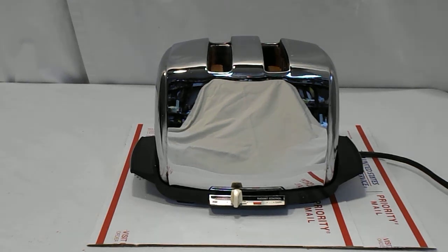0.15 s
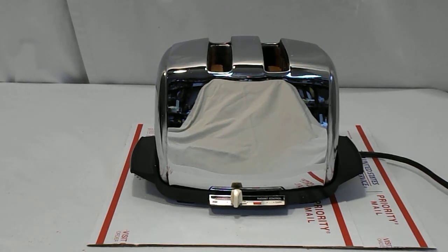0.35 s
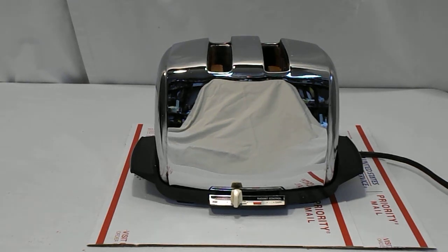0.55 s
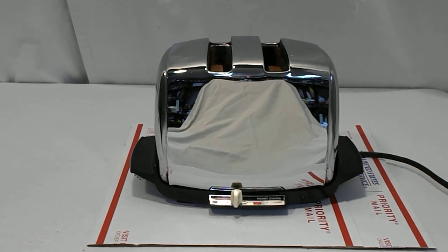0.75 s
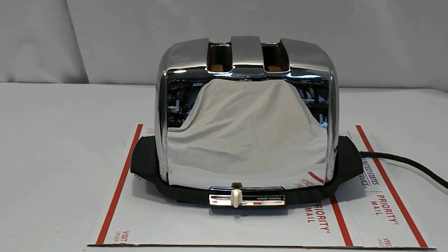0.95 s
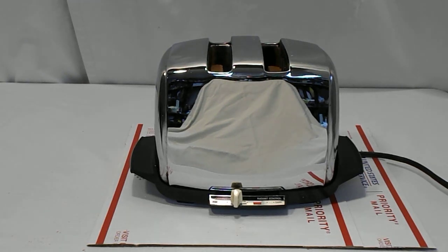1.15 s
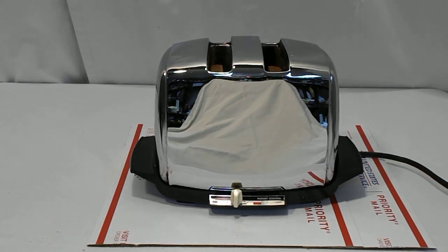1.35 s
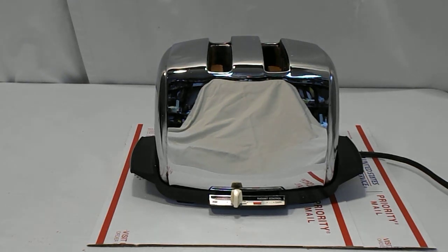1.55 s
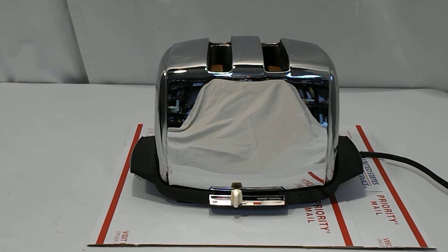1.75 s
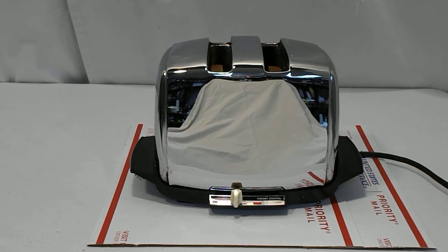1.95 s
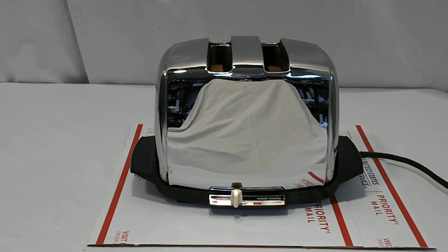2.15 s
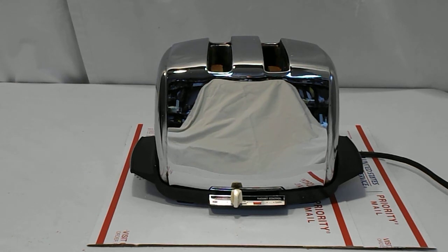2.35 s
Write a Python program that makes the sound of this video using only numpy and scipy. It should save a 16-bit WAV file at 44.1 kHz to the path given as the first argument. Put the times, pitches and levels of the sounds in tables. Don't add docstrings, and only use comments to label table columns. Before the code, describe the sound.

One crisp, rattly toaster click with a short metal ring, amid soft sliding hiss and quiet room noise.

```python
import sys
import numpy as np
from scipy import signal
from scipy.io import wavfile
from scipy.ndimage import uniform_filter1d

SR = 44100
rng = np.random.default_rng(int(sys.argv[2]) if len(sys.argv) > 2 else 0)


def master(y):
    cut = np.clip(np.atleast_2d(y).T, -1, 1)
    pcm = np.round(cut * 32767)
    wavfile.write(sys.argv[1], SR, pcm.astype(np.int16))


def magnitude_from_level(level_db):
    exponent = np.asarray(level_db, float) / 20
    return 10 ** exponent


N = 110250

# (frequency [Hz], level per Hz [dB])
AIR = [(15, -60), (25, -32), (48, -14), (87, -8.5), (221, -1), (417, -5.5), (824, -10), (4060, -20),
       (6800, -27), (8840, -64), (15000, -120)]
# (time [s], level [dB])
AIR_LEVEL = [(0, -60), (.8, -63), (1.9, -63), (2.5, -62)]
# (frequency [Hz], level [dB])
HUM = [(60, -83.5), (120, -81.5), (300, -82)]
# (resonance [Hz], width [Hz], level [dB])
GUIDES = [(1200, 1400, -8.5), (2350, 800, -8), (2965, 320, -1), (3215, 600, 1), (3850, 500, -1),
          (4400, 750, -0.5), (5287, 760, -9.5)]
# (time [s], level [dB])
SLIDE_LEVEL = [
    (0, -61),
    (.11, -60),
    (.2, -61),
    (.4, -62),
    (.64, -63),
    (.72, -67),
    (.8, -80),
    (.86, -95),
]
# (time [s], level [dB], centre [Hz], width [Hz])
TICKS = [
    (1.995, -56.5, 870, 1280),
    (2.0094, -67, 4070, 2000),
    (2.0821, -69, 4750, 3470),
    (2.160, -70, 5450, 2500),
    (2.2307, -68, 5300, 2500),
    (2.269, -63, 4640, 3880),
    (2.343, -68, 5030, 3200),
]
# (time [s], level [dB], frequency [Hz], time to fall 60 dB [s])
RINGS = [
    (2.0105, -58, 4530, .11),
    (.2174, -54, 225, .3),
    (.2174, -52, 430, .2),
]
# (time [s], level [dB], extra treble [dB])
CONTACTS = [(.2066, -25.5, -18.5), (.2095, -29, -12), (0.211, -27, -7), (.2145, -29.5, 1),
            (.2161, -22.5, 7), (.2174, -26, 3.5), (.2194, -20, 4.5), (.2207, -20.5, 7), (.2221, -28, 4.5),
            (.2238, -31.5, 3.5), (.2253, -30, -3), (.2266, -19, 0), (.2290, -25, -1.5), (.2317, -30.5, -1),
            (.2343, -18.5, -5), (.2380, -29.5, -5.5)]
# (frequency [Hz], level [dB], time to fall 60 dB [s])
SHELL = [(554, -7, .2), (672, -11, .18), (752, -10, .33), (979, -3, .16), (1141, -4, .16), (1181, -6, .15),
         (1541, -7, .12), (1775, -10, .17), (1945, -11, .16), (2300, -9, .07), (2937, -12, .1),
         (3025, -17, .2)]
# (frequency [Hz], level [dB], time to fall 60 dB [s])
WIRES = [(3400, -12, .13), (3749, -8, .16), (4050, -6, .11), (4085, -1, .12), (4107, -5, .17),
         (4312, -8, .11), (4469, -8, .11), (4686, -10, .14), (4759, -7, .11), (4875, -7, .11),
         (5203, -7, .12), (5254, -7, .12), (5930, -7, .11), (6050, -2, .08)]
# (frequency [Hz], level [dB])
CLATTER = [(480, -29), (620, -9), (1000, -7.5), (2700, -15), (4140, -6.5), (6100, -1.5), (7800, -20.5),
           (10900, -24)]
# (frequency [Hz], time to fall 60 dB [s])
CLATTER_T60 = [(400, 0.33), (1000, .22), (2500, 0.29), (4000, 0.26), (6000, .17), (7600, 0.1), (9200, .16),
               (11000, .13)]
# (centre [Hz], width [Hz], level [dB])
HISS = [(7800, 970, -96.5), (8950, 850, -96.5), (10660, 1000, -91)]
# (centre [Hz], width [Hz])
NOTCHES = [(6950, 1000), (8450, 720), (10000, 270)]

SHELL_DB, WIRES_DB, CRACK_DB, CLATTER_DB = -20, -15.5, 4, -19
CRACK_T60_S, TICK_T60_S, RISE_S = .0066, .1, .0004
SCRAPE_S, SCRAPE_LEN_S, SCRAPE_DB = .668, .03, -70.5
STIR_DB, STIR_HZ, STIR_FROM_S = -71.5, 1110, 1.97
GRAINS_PER_S, GRAINS_DB, GRAIN_SPREAD_DB = 65, -74, 2
WAVER_DB, WAVER_PER_S = 3, 60
PULSE_HZ, PULSE_S, PULSE_DB = 78.05, .001, 9
LIMIT = .4


def unit(x):
    return x / np.sqrt(np.mean(x ** 2))


def cut(x, hz, kind, order=4):
    return signal.sosfilt(signal.butter(order, hz, kind, fs=SR, output="sos"), x)


def band(hz, width, order=1, size=N):
    edges = [max(hz - width / 2, 10), hz + width / 2]
    sos = signal.butter(order, edges, "band", fs=SR, output="sos")
    return unit(signal.sosfilt(sos, rng.standard_normal(size)))


def read(table, at, log=False):
    x, y = np.array(table).T
    return np.interp(np.log(at), np.log(x), y) if log else np.interp(at, x, y)


def walk(rate):
    hold = int(SR / rate)
    steps = np.repeat(rng.standard_normal(N // hold + 1), hold)
    return unit(uniform_filter1d(uniform_filter1d(steps, hold), hold)[:N])


def fade(t, t60):
    since = np.clip(t, 0, None)
    return (1 - np.exp(-since / RISE_S)) * np.exp(-np.log(1000) * since / t60)


def room(t):
    air = 0
    for hz in 25 * 2 ** np.arange(0, 8.2, 1 / 3):
        flicker = magnitude_from_level(read(AIR, hz, True) + 1.2 * walk(16))
        air = air + band(hz, hz / 4, order=2) * np.sqrt(hz) * flicker
    stir = magnitude_from_level(STIR_DB + 4.2 * walk(5.23)) * band(STIR_HZ, 1100, order=2)
    stir = stir * np.clip((t - STIR_FROM_S) / 0.081, 0, 1)
    hum = sum(magnitude_from_level(db) * np.sqrt(2) * np.sin(2 * np.pi * hz * t) for hz, db in HUM)
    return unit(air) * magnitude_from_level(read(AIR_LEVEL, t)) + stir + hum


def crackle():
    chance, luck = rng.random((N, 2)).T
    strength = magnitude_from_level(-GRAIN_SPREAD_DB * np.log(luck + 0.032))
    grains = (chance < GRAINS_PER_S / SR) * strength * np.sign(rng.standard_normal(N))
    dull = cut(cut(grains, 1500, "low", order=2), 200, "high", order=2)
    return magnitude_from_level(GRAINS_DB) * unit(dull)


def ticks(t):
    out = np.zeros(N)
    for s, db, hz, t60 in RINGS:
        out += magnitude_from_level(db) * fade(t - s, t60) * np.sin(2 * np.pi * hz * (t - s))
    for s, db, hz, width in TICKS:
        out += magnitude_from_level(db) * band(hz, width, order=2) * fade(t - s, TICK_T60_S)
    return out


def carriage(t):
    rub = sum(magnitude_from_level(db + 0.69 * walk(10)) * band(hz, width, order=2) for hz, width, db in GUIDES)
    rub = unit(cut(rub, 5645, "low", order=6))
    swell = np.exp(-((t - SCRAPE_S) / SCRAPE_LEN_S) ** 2)
    scrape = magnitude_from_level(SCRAPE_DB) * swell * band(6450, 2300, order=3)
    return rub * magnitude_from_level(read(SLIDE_LEVEL, t)) + scrape


def ring(modes, t, energy):
    out = np.zeros(len(t))
    for hz, db, t60 in modes:
        waver = magnitude_from_level(db + WAVER_DB * walk(WAVER_PER_S)[:len(t)])
        phase = 2 * np.pi * rng.random()
        out += waver * energy(hz, t60) * np.sin(2 * np.pi * hz * t + phase)
    return out


def switch(t):
    span = slice(int(.2 * SR), int(.6 * SR))
    u = t[span]
    start, db, treble_db = np.array(CONTACTS).T[:, :, None]

    def energy(hz, t60):
        strength = magnitude_from_level(db + treble_db * (hz > 2800))
        return np.sqrt(np.sum((strength * fade(u - start, t60)) ** 2, axis=0))

    hit = magnitude_from_level(SHELL_DB) * ring(SHELL, u, energy) + magnitude_from_level(WIRES_DB) * ring(WIRES, u, energy)
    for hz in 400 * 2 ** np.arange(0, 4.9, .4):
        clatter = magnitude_from_level(CLATTER_DB) * energy(hz, read(CLATTER_T60, hz, True))
        crack = magnitude_from_level(CRACK_DB) * energy(hz, CRACK_T60_S)
        colour = magnitude_from_level(read(CLATTER, hz, True)) * np.sqrt(hz / 4000)
        hit = hit + band(hz, hz / 3.5, order=2, size=len(u)) * colour * (clatter + crack)
    out = np.zeros(N)
    out[span] = hit
    return cut(out, 510, "high", order=6)


def scene():
    t = np.arange(N) / SR
    return (room(t) + crackle() + ticks(t) + carriage(t) + switch(t))[None]


def top_cut(x):
    return signal.sosfilt(signal.butter(12, 12660, fs=SR, output="sos"), x)


def record(dry):
    since = (np.arange(N) / SR - .006) % (1 / PULSE_HZ) - .5 / PULSE_HZ
    pulse = 1 + magnitude_from_level(PULSE_DB) * np.exp(-(since / PULSE_S) ** 2)
    hiss = sum(magnitude_from_level(db) * band(hz, width, order=2) for hz, width, db in HISS)
    x = LIMIT * np.tanh(dry / LIMIT) + pulse * hiss
    for hz, width in NOTCHES * 2:
        x = signal.lfilter(*signal.iirnotch(hz, hz / width, SR), x)
    x = signal.sosfilt(signal.ellip(8, .3, 50, 11600, fs=SR, output="sos"), x)
    return top_cut(x)


dry = scene()
out = record(dry)
master(out)
```